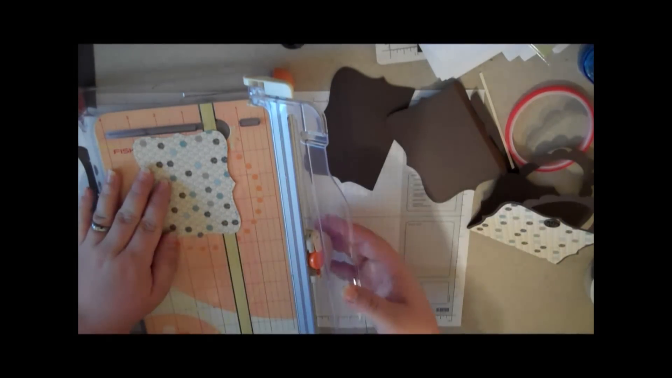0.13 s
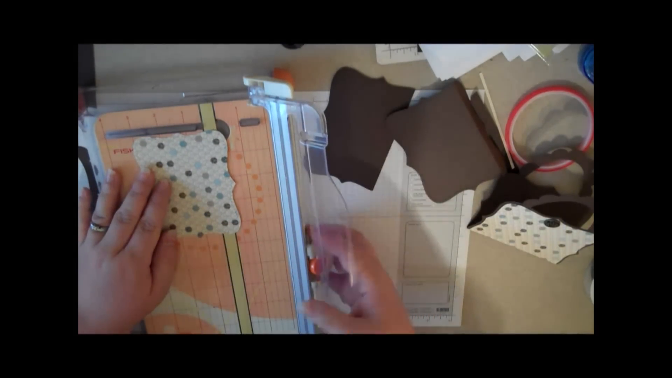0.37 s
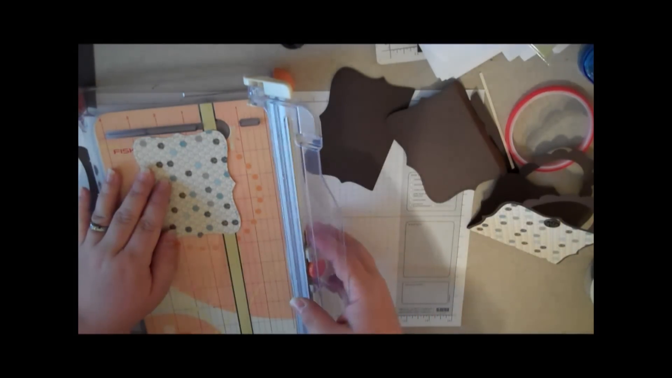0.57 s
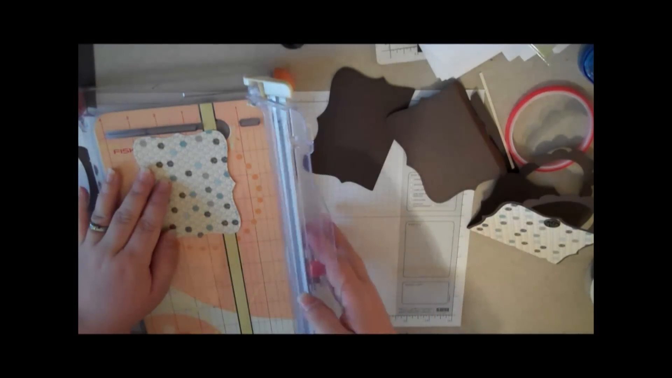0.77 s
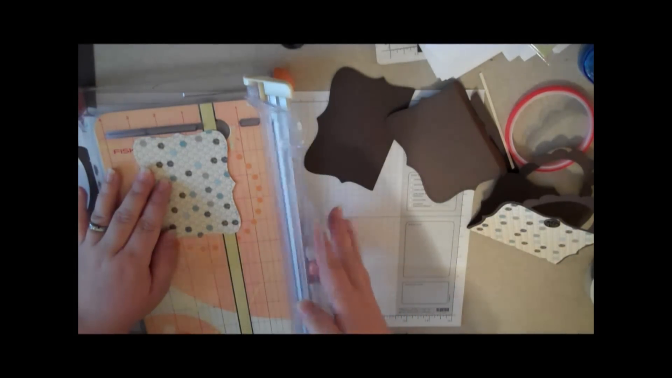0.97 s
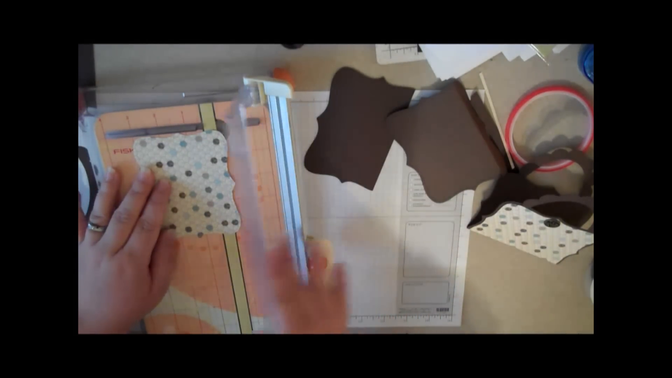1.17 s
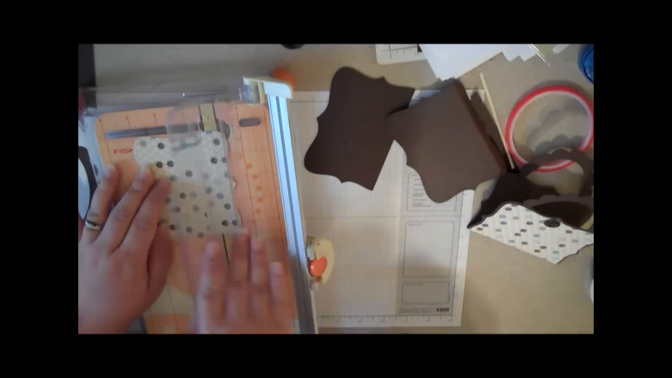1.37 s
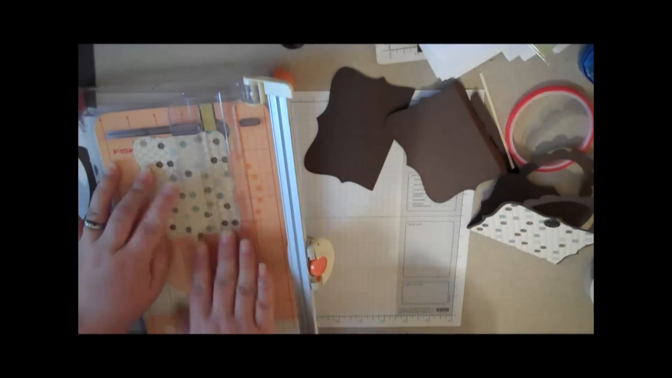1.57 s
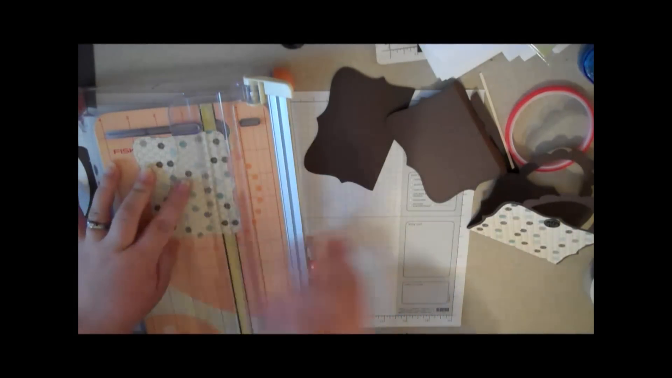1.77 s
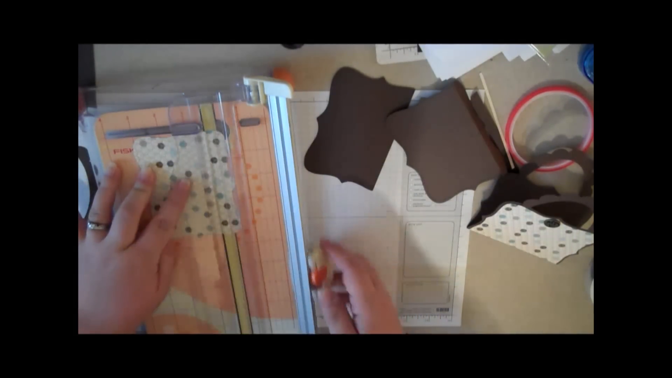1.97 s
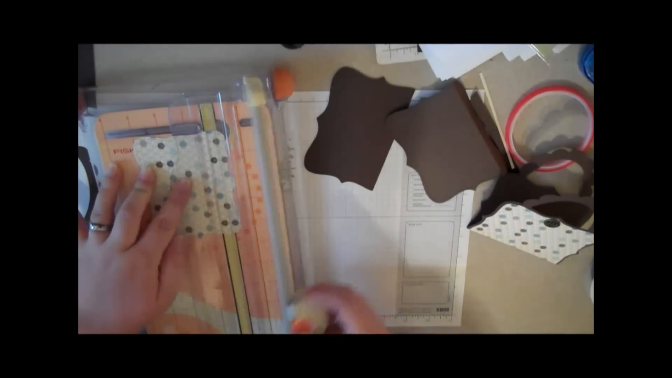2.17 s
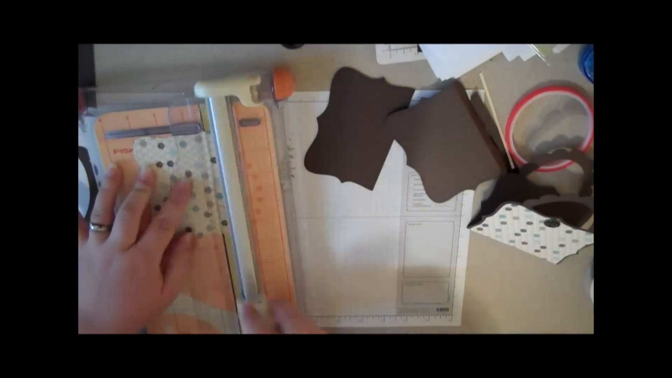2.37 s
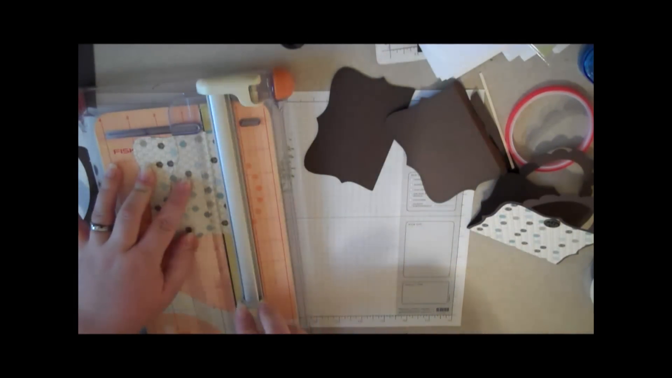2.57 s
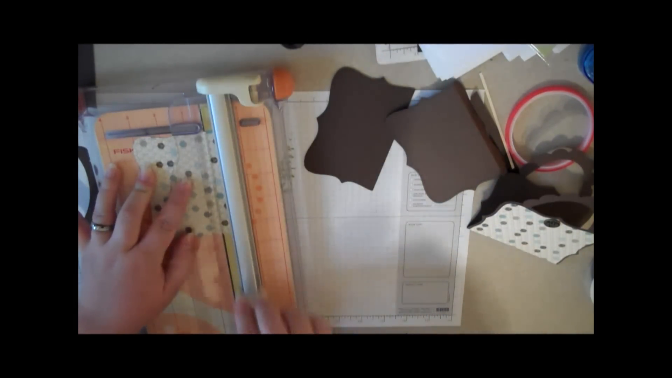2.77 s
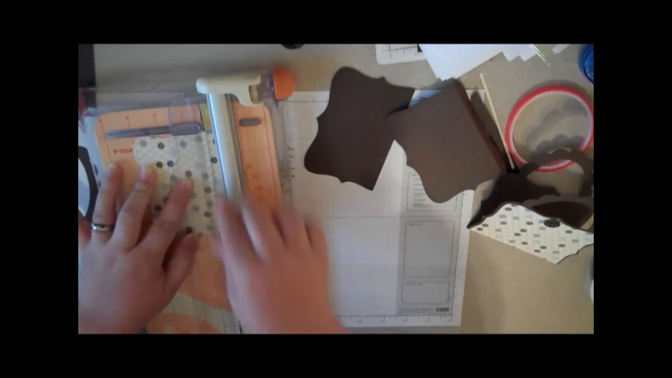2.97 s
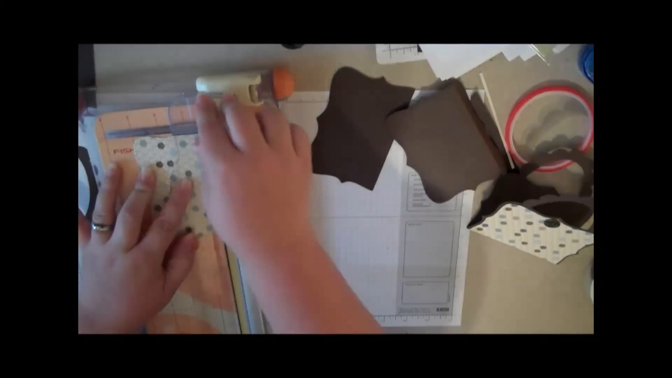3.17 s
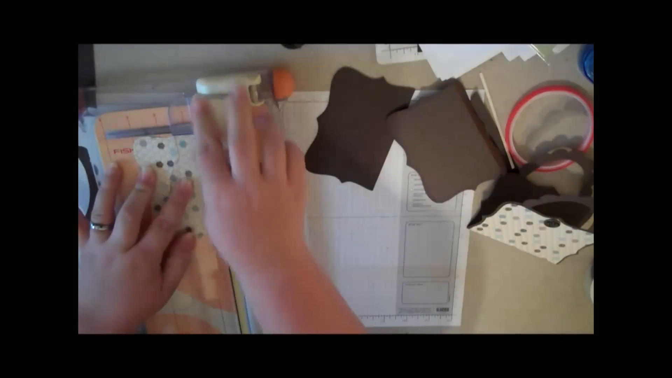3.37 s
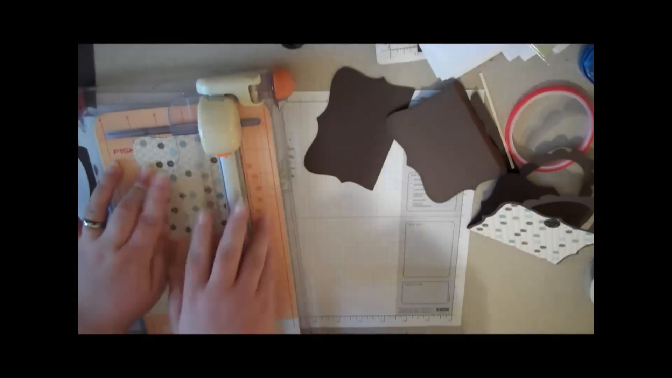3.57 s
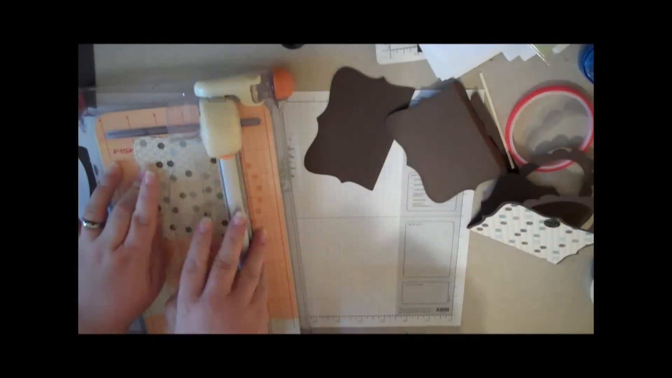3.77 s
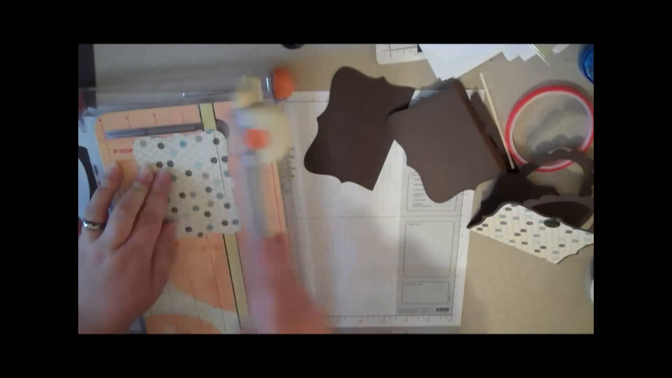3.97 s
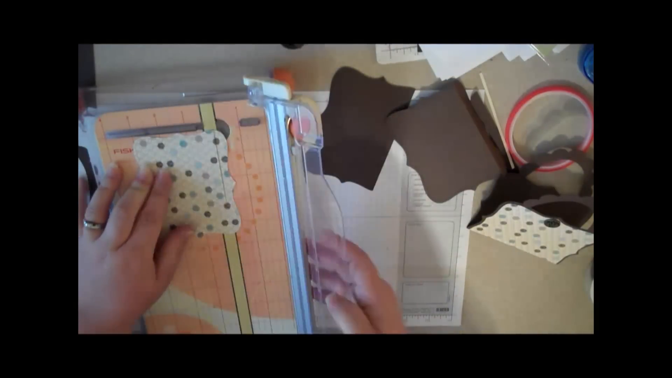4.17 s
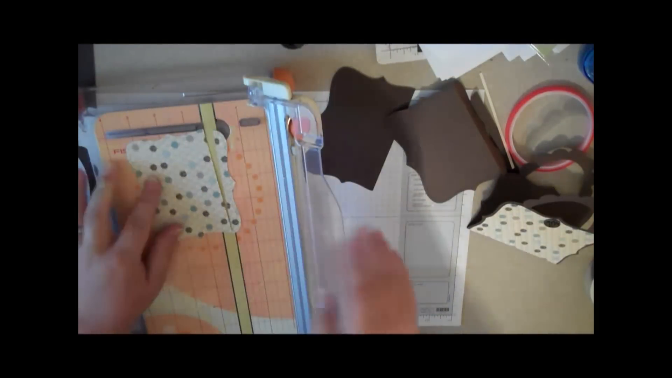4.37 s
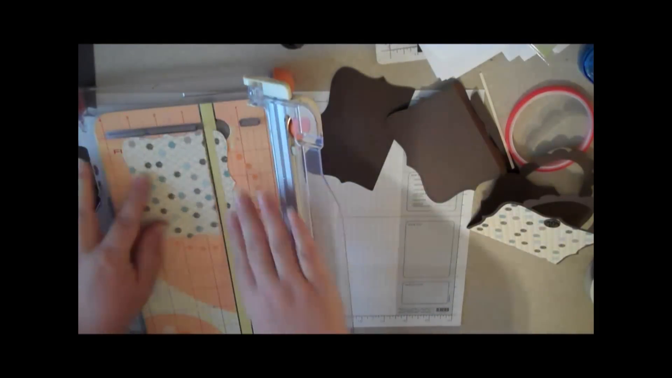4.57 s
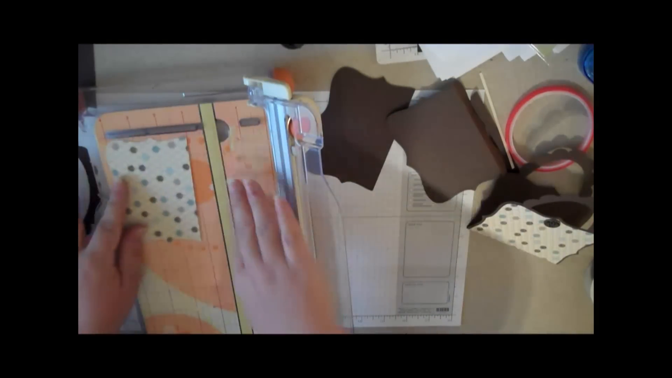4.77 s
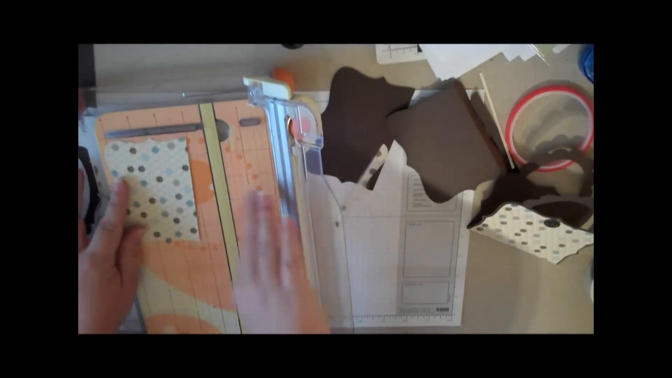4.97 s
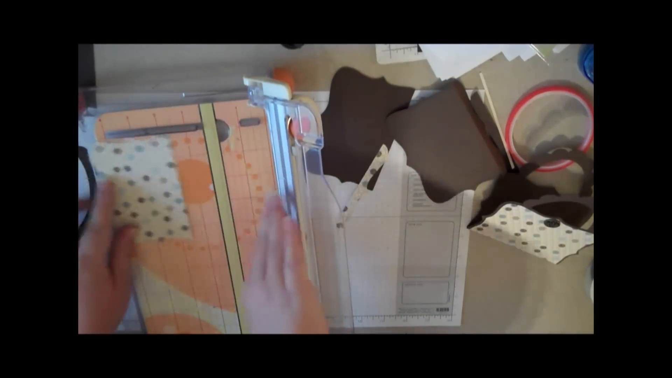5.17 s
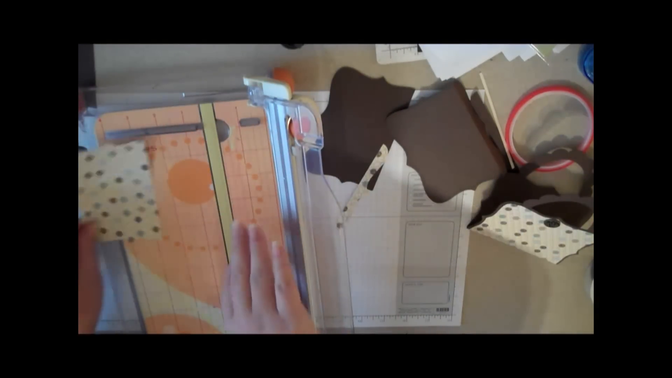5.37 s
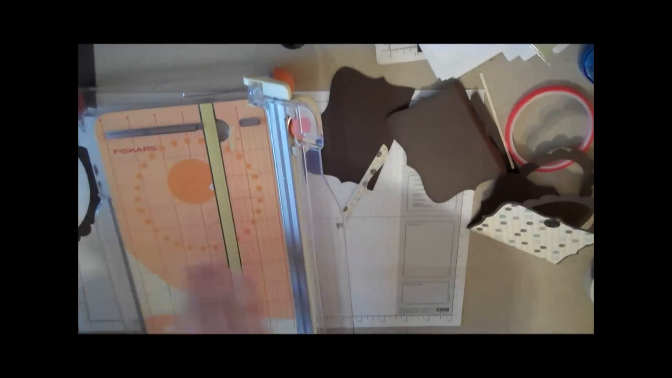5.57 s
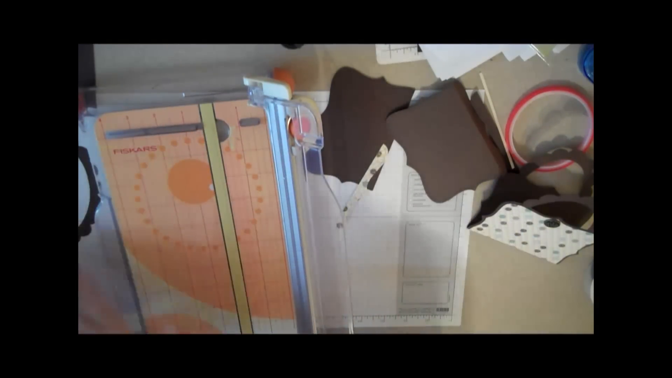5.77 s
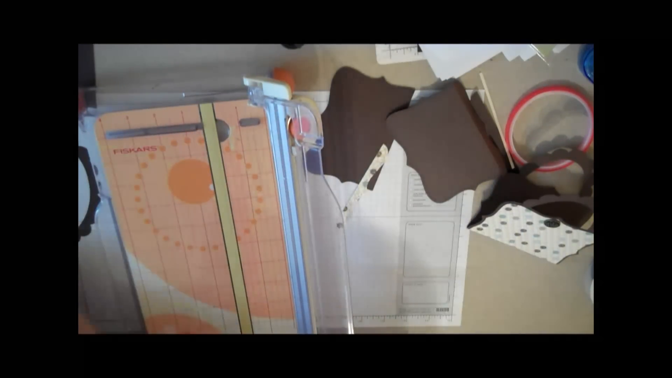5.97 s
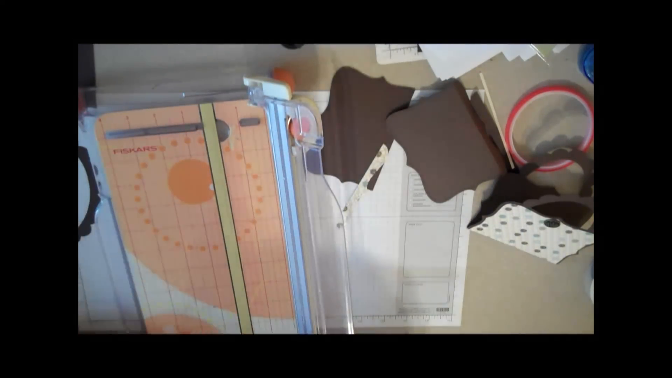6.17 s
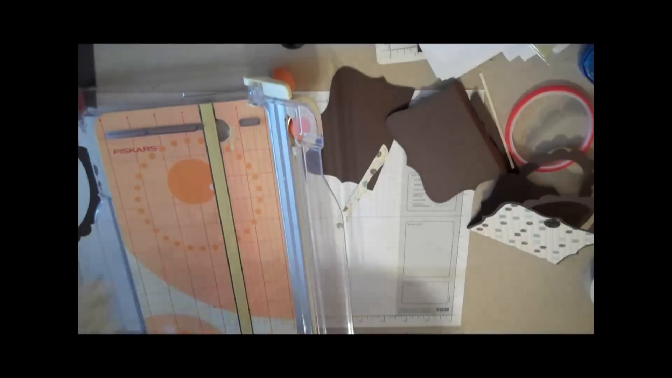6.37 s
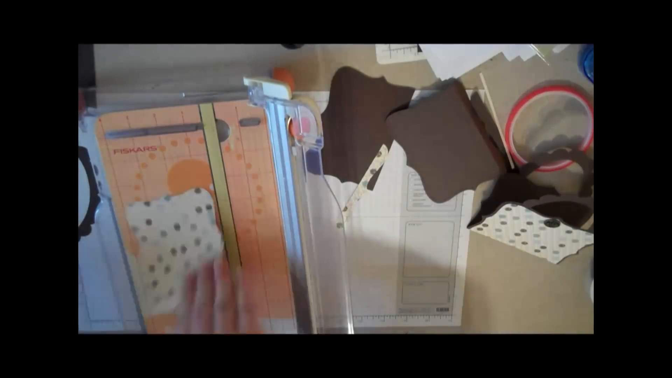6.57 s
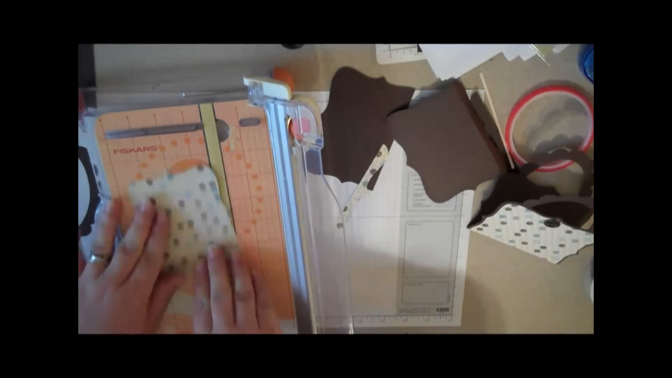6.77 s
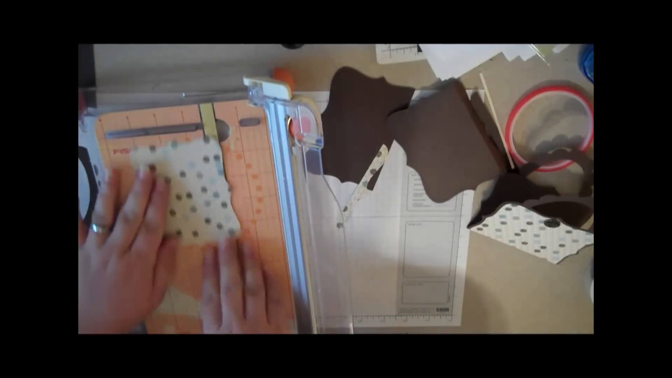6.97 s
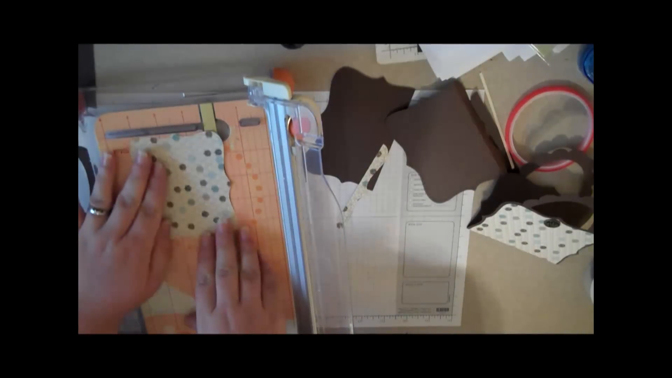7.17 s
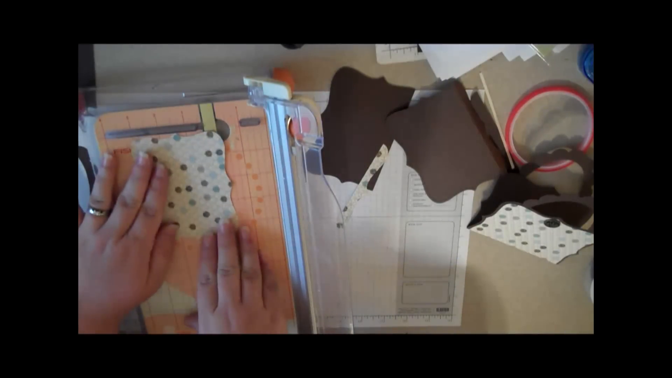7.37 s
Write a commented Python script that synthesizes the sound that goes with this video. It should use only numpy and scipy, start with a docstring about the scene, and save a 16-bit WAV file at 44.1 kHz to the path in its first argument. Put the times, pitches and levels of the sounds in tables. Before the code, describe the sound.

Indoors, close to the desk, a sliding paper trimmer is worked by hand. Quiet knocks lead to a bright hard snap, a double clack, and a swelling gritty rasp as the blade cuts card, ending in crisp stop clicks. A second strong snap opens the arm. Afterwards come small ticks, papery slides and a light flop as card is replaced, with tiny wavering chirps at left over faint hiss and hum.

```python
"""Soft knocks and a faint hiss on a rail open in a small humming room: a plastic paper trimmer on a desk, up close.
Its arm swings over and snaps home, the cutter rasps along the rail and hits its stops, and the arm swings back.
Then card slides off the board and is laid on again; thin high chirps come from the left.
Blows are noise bursts ringing plastic modes, slides are grainy filtered noise, chirps are wavering sines;
echoes, hollow desk rings, low shudders, hiss and hum surround them."""
import sys
import numpy as np
from scipy import signal
from scipy.fft import rfft, irfft, next_fast_len
from scipy.io import wavfile
from scipy.ndimage import uniform_filter1d

SR = 44100
rng = np.random.default_rng(int(sys.argv[2]) if len(sys.argv) > 2 else 0)


def int16_out(signal):
    """Quantize to a 16-bit WAV file."""
    q = np.round(np.clip(np.atleast_2d(signal).T, -1, 1) * 32767)
    wavfile.write(sys.argv[1], SR, q.astype(np.int16))


N = 327663
HISS_EDGE_HZ = 14300  # top of the slides, chirps, echoes and room hiss

# edges between the six registers of a blow: boom, thud, board, clack, snap, tick [Hz]
REGISTER_HZ = [230, 480, 1400, 4200, 9000]
# left-over-right balance of blows and slides, before panning: pitch_hz [Hz], balance_db [dB]
PORTS = [(100, 1), (2400, -.5), (4400, -2.5), (5800, -9.5), (7000, 8), (8100, 10.5), (14000, 8)]
# pushes of the cutter along its rail, levels before trims and sag:
# start_s, rise_s, hold_s, release_s [s], hiss_db, rasp_db [dB]
RAIL_STROKES = [(.24, 0.065, .025, 0.083, -50.5, -65), (.375, 0.02, 0.025, .02, -52.5, -69),
                (1.925, 0.076, 0.064, 0.15, -41, -54), (2.1, .035, .03, .14, -39, -56),
                (2.715, 0.098, 0.18, .03, -40, -47), (2.947, 0.02, 0.16, 0.055, -27.5, -39)]
# colour of the blade's rasp: pitch_hz [Hz], level_db [dB]
RAIL_RASP = [(40, -25.5), (150, -7), (230, -10.5), (330, -13), (550, -20.5), (750, -6.5), (1100, -12.5),
             (1500, -4), (2100, 1), (3800, 1.5), (5000, -4.5), (8000, -32)]
# likeness of left and right in diffuse sound: pitch_hz [Hz], likeness [0-1]
DIFFUSE = [(30, .55), (120, .85), (700, .84), (1400, .72), (3000, .45), (7000, .15), (12000, 0)]


def knocks(tone, size=8192):
    """All blows of arm, cutter and card on the trimmer; tone is how far its resonances stand out."""
    # blows: start_s [s], snap_db [dB], weight_db and clack_db [dB re snap], chatter_s [s],
    # note_hz [Hz] of the struck part, note_db [dB] before tone, pan_db [dB] (left positive, treble gets half)
    blow_rows = [(0.34, -62, -13, 3.5, .006, 730, 6, -12), (.448, -52, -24, -9, 0.0055, 6040, 14, -4),
                 (.803, -58, -18, 3.5, 0.0073, 1890, 26, 9), (.885, -54.5, -18, -5, 0.017, 940, 3, 0),
                 (.899, -43, -23.5, -4, .003, 2080, 21, 3), (0.95, -51, -24, -6, .004, 7760, 17, 21),
                 (1.508, -46.5, -11, 4, 0.0018, 1310, 7, -1), (1.532, -41.5, -21, -14, .0015, 7140, 4, 7),
                 (1.58, -30, -22, -10, 0.0077, 950, 4, -1), (1.5879, -11, -37, -12, .002, 5880, 13, 4),
                 (1.5905, -25, -21, 3, 0.0039, 2350, 14, 2), (1.602, -37, -12, 0, .003, 760, 6, 0),
                 (1.929, -47, -29.5, -7.5, 0.01, 850, 12, 2), (2.173, -46.5, -25.5, -4.5, 0.018, 760, 3, 7),
                 (2.22, -57, -4, 5.5, .012, 1620, 13, 4), (2.257, -59.5, -2, -2, .012, 750, -2, 1),
                 (2.446, -22, -32.5, -7, 0.00077, 3120, 2, 11.5),
                 (2.449, -20, -26, -3, 0.0031, 3200, 15, 5), (2.452, -22, -18.5, -13, 0.0028, 640, 12, 4),
                 (2.529, -37, -41, -27, 0.0027, 7200, 20, 2), (2.564, -47.5, -24, 3, 0.0045, 2220, 18, -3),
                 (2.622, -34.5, -30, -4.5, 0.0016, 4320, 12, -3),
                 (2.669, -40.5, -14.5, 2.5, .001, 810, -1, -2), (2.848, -44, -20, -5, .009, 5650, 4, -3),
                 (2.876, -35.5, -28, -17, 0.0052, 6100, 9, 0), (3.191, -21, -31, -9, 0.0024, 7100, 1, 2),
                 (3.321, -49.5, -8, 1, 0.0056, 720, 9, -4), (3.367, -59.5, -3, 0, .014, 643, 10, -2),
                 (3.393, -51.5, -15, 4, 0.0055, 1940, 8, 10), (3.411, -23, -31, -8.5, 0.016, 6100, 11, -5),
                 (3.418, -21, -37, -9.5, 0.0032, 5720, 8, -1), (3.424, -26, -25, -6, 0.0036, 5800, 10, 7),
                 (3.434, -37.5, -17, 5, 0.0038, 2170, 10, -6), (3.611, -38, -26, -10, 0.0021, 8100, 8, 13),
                 (3.642, -37.5, -17.5, -1, 0.0022, 840, 9, -6),
                 (3.892, -46, -20.5, -6.5, 0.0038, 7200, -1, -1),
                 (4.008, -47.5, -17, 0.5, 0.0053, 685, 0, 0), (4.047, -48.5, -11, 5.5, 0.0037, 830, 2, 3),
                 (4.084, -50.5, -16, -4, 0.0043, 830, 7, -5), (4.135, -10.5, -33, -16, .0018, 5850, 4, -4),
                 (4.1385, -18.5, -34, -9.5, 0.0016, 6030, 12, 2),
                 (4.158, -25, -40, -5.5, 0.0013, 5800, 16, 22), (4.16, -14, -43, -14, 0.0013, 5700, 3, 1.5),
                 (4.191, -39, -23, -0.5, 0.0054, 5720, 6, -2),
                 (4.575, -53, -3.5, -1, 0.016, 1890, 19, 19.5), (4.818, -40, -23, -7, 0.0015, 5980, 4, 12),
                 (4.825, -32, -21, -6, 0.014, 3270, 10, 11), (4.87, -43, -21, -5.5, 0.026, 2170, 4, 6),
                 (4.904, -27.5, -26.5, -7, 0.0026, 790, 12, 8), (4.951, -34, -27, -19, 0.015, 5770, 10, 5),
                 (4.991, -37.5, -30, -12, .014, 5720, 1, 8), (5.008, -29, -36, -7.5, 0.0034, 6400, -1, 3),
                 (5.125, -39, -14, 3, 0.0085, 3160, 16, 1), (5.158, -39.5, -17, -6, 0.0058, 770, 4, 8),
                 (5.175, -34.5, -30, -7, 0.0045, 6160, 11, 6), (5.275, -46, -25, 1.5, 0.0041, 6040, 2, 4),
                 (5.782, -47.5, -27, -12, 0.0056, 7600, 7, 10),
                 (5.964, -39, -28, -16, 0.0022, 7800, 20, 13), (6.204, -39, -33, -11, 0.0054, 6130, 14, -6),
                 (6.319, -35, -30, -7, 0.0057, 806, -2, 13), (6.594, -37, -38, -15, 0.0027, 6000, 2, 5),
                 (6.641, -38, -38, -14, .0056, 6300, 11, -1), (6.659, -46.5, -33, -1, 0.0037, 6240, 6, 3),
                 (6.681, -44.5, -26, -18, .002, 5900, 4, 6), (6.792, -41, -30, -23, 0.0037, 7500, 12, 17),
                 (7.38, -65.5, -18, 9.5, .012, 1770, 13, 10)]
    out = np.zeros((2, N))
    for row in blow_rows:
        start_s, blow = knock(row, rng.standard_normal((2, size)), tone)
        add(out, start_s, blow)
    return out


def knock(row, grit, tone, rattle_db=-9, rattle_s=0.019, bass_s=0.0095, bass_hz=450, touch=0.69, note_share=0.3):
    """One contact, a quick chatter and a short rattle of loose parts, all ringing the plastic."""
    # broad colour of a blow, before its registers are levelled: pitch_hz [Hz], level_db [dB]
    blow_colour = [(30, -22), (100, -23), (700, 2.5), (1500, 1.5), (2200, 4), (5000, 3.5), (7500, 3.5),
                   (9000, -5), (12000, -20.5), (14000, -22.5), (16000, -36)]
    start_s, snap_db, weight_db, clack_db, chatter_s, note_hz, note_db, pan_db = row
    size = grit.shape[1]
    t = np.arange(size) / SR
    hz = bins(t)
    chatter_s = max(chatter_s, 1e-4)
    chatter = unit(grit * np.exp(-t / chatter_s))
    rattle = unit(grit[:, ::-1] * np.exp(-t / rattle_s))  # the same noise read backwards
    force = chatter + amp(rattle_db) * rattle
    force[0, 0] += touch * np.sqrt(size) * np.exp(-chatter_s / 0.0096)  # the hard first touch of a brief blow
    thump = unit(grit * np.exp(-t / bass_s))  # the heavy board follows slowly
    heavy = 1 / (1 + (hz / bass_hz) ** 4)
    spectrum = rfft(pair(force)) * causal(1 - heavy + 0.015) + rfft(pair(thump)) * causal(heavy)
    spectrum = spectrum * sides(read(PORTS, hz) + .5 * pan_db * np.minimum(hz / 5000, 1))
    note_lift_db = tone * note_db * bump(hz, note_hz, note_share * note_hz + 60)
    colour = amp(read(blow_colour, hz) + note_lift_db) * plastic(hz) ** tone

    # where the blow lands sets how strongly each register answers
    register = np.searchsorted(REGISTER_HZ, hz)
    energy = np.bincount(register, np.mean(abs(spectrum * colour) ** 2, axis=0)) * 2 / size
    want_db = snap_db + registers(weight_db, clack_db, note_hz, pan_db)
    # blows harder than -41.5 dB are too brief to boom the desk fully; softer ones boom more
    want_db[0] -= 0.064 * (snap_db + 41.5)
    lift_db = (want_db - 10 * np.log10(energy / (.015 * SR)))[register]
    # blur the steps between registers, more widely in the treble
    narrow, medium, wide = (uniform_filter1d(lift_db, size=n) for n in (21, 121, 361))
    lift_db = np.select([hz < 900, hz < 2800], [narrow, medium], wide)
    fade = np.cos(np.pi / 2 * t / t[-1]) ** 2
    return start_s, irfft(spectrum * causal(colour * amp(lift_db))) * fade


def registers(weight_db, clack_db, note_hz, pan_db):
    """Target boom, thud, board, clack, snap and tick of a blow, in dB relative to its snap."""
    # the board's knock follows weight and clack, more so when the struck note is low
    board_db = 0.49 * weight_db + .5 * clack_db + 8 * (note_hz < REGISTER_HZ[2])
    tick_db = -21.5 + 0.74 * pan_db  # brighter for blows on the left
    return np.array([weight_db - 2.5, weight_db + 0.5, board_db, clack_db, 0, tick_db])


def plastic(hz):
    """Gain of the trimmer's resonances."""
    # what the plastic rings with: pitch_hz, width_hz [Hz], height_db [dB, callers scale it by an exponent]
    modes = [(151, 30, 8.5), (322, 58, 4.5), (440, 92, -2.5), (497, 29, 8.5), (614, 43, 5), (777, 170, 7.5),
             (988, 76, 5.5), (1286, 50, 3.5), (2050, 350, 2.5), (2460, 78, -0.5), (2730, 48, -6.5),
             (3160, 150, 0), (3860, 170, 2), (4380, 150, 2.5), (5510, 110, 4), (5850, 460, 7),
             (6100, 130, 0.5), (6800, 100, -3.5), (7080, 330, 4.5)]
    return amp(sum(db * bump(hz, f, width) for f, width, db in modes))


def cutter():
    """The carriage hisses and rumbles on the rail; the blade rasps and tears when it bites into card."""
    # colour of the carriage's hiss: pitch_hz [Hz], level_db [dB]
    rail_hiss = [(2500, -37), (4600, -9.5), (5700, 0.5), (6500, 0), (7400, 2), (8400, -5), (10000, -15),
                 (14000, -22.5)]
    # the blade tearing on through the card, level before trim and sag:
    # start_s, rise_s, hold_s, release_s [s], level_db [dB], first_hz, last_hz [Hz]
    blade_tears = [(3.03, 0.0556, .05, 0.0254, -38.5, 2655, 2920)]
    # the carriage rumbling as it nears the stop, level before sag:
    # start_s, rise_s, hold_s, release_s [s], level_db [dB], first_hz, last_hz [Hz]
    rumbles = [(2.85, .25, .1, .1, -57, 160, 230)]
    hiss = friction(RAIL_STROKES, 1, rail_hiss, (4500, 9000), grain_db=-0.5, grain_hz=250, ring=0.4, pan_db=3.0)
    rasp = friction(RAIL_STROKES, 2, RAIL_RASP, (1600, 4000), grain_db=-1.0, grain_hz=138, ring=0.49, pan_db=-1.0)
    tear = scrape(blade_tears, width_hz=760, grain_db=3.5)
    rumble = scrape(rumbles, width_hz=140, grain_db=2)
    return amp(-1.7) * hiss + amp(-2.5) * rasp + amp(-4.0) * tear + rumble


def fibres(per_s=110, spread_db=4, level_db=-4):
    """Single fibres of the card snap under the blade, in step with its rasp."""
    snaps = (rng.random(N) < per_s / SR) * amp(spread_db * np.minimum(rng.exponential(1, N), 3))
    hz = np.fft.rfftfreq(2048, 1 / SR)
    ring = irfft(causal(amp(read(RAIL_RASP, hz)) * plastic(hz)))
    return amp(level_db) * along(RAIL_STROKES, 2) * unit(signal.oaconvolve(snaps, ring)[:N])


def surge(depth_db=1.8, rate_hz=55):
    """The hand's push sticks and slips, so the whole stroke swells unevenly."""
    swell = unit(shape(rng.standard_normal(N), lambda hz: 1 / (1 + (hz / rate_hz) ** 4)))
    return amp(depth_db * swell)


def card():
    """Card and fingertips brush the board, hum as they drag and rasp at the card's edge."""
    # card and fingers sliding, levels before trims and sag:
    # start_s, rise_s, hold_s, release_s [s], hiss_db, rub_db [dB]
    card_strokes = [(.97, 0.22, 0.54, .03, -67, -68), (2.54, .03, .05, .03, -52, -50),
                    (3.92, .04, .05, .03, -62, -61.5), (4.095, 0.027, .004, .015, -61, -47),
                    (4.565, 0.013, 0.34, .03, -58.5, -53.5), (4.83, .02, .18, .04, -54, -53),
                    (5.13, .02, .06, .06, -54, -52), (5.29, 0.085, 0.011, .16, -51, -51),
                    (5.57, 0.019, 0.47, .04, -60, -60), (5.96, 0.071, 0.12, .15, -42, -53.5),
                    (6.19, 0.011, .13, 0.077, -44.5, -51), (6.4, 0.0084, 0.2, .03, -58, -62.5),
                    (6.612, 0.0093, .045, 0.11, -46, -53), (6.783, 0.008, 0.33, 0.18, -53, -58)]
    # colour of the card's hiss: pitch_hz [Hz], level_db [dB]
    card_hiss = [(2000, -27), (3200, -11), (4600, -7.5), (5900, 1), (7600, 1.5), (9000, -7.5),
                 (11000, -14.5), (14000, -18)]
    # colour of the lower rub: pitch_hz [Hz], level_db [dB]
    card_rub = [(50, -3.5), (120, -5), (220, -16), (350, -0.5), (900, -2), (1200, -1), (1550, 4.5),
                (1900, -0.5), (3200, 1), (6000, -18)]
    # a dragging fingertip's faint hum, level before trim and sag:
    # start_s, rise_s, hold_s, release_s [s], level_db [dB], first_hz, last_hz [Hz]
    finger_drags = [(4.6, .15, 0.076, 0.0257, -53.5, 1695, 1278),
                    (6.77, 0.043, 0.223, 0.158, -64, 1604, 1534)]
    # a card edge rasping as it is pulled away, level before trim and sag:
    # start_s, rise_s, hold_s, release_s [s], level_db [dB], first_hz, last_hz [Hz]
    edge_rasps = [(5.98, 0.0387, 0.0914, 0.049, -54, 3090, 3234), (6.19, .03, .04, .13, -42, 3500, 3300)]
    hiss = friction(card_strokes, 1, card_hiss, (4500, 7600), grain_db=1.0, grain_hz=150, ring=.15, pan_db=1.0)
    rub = friction(card_strokes, 2, card_rub, (1200, 3600), grain_db=1.5, grain_hz=119, ring=0.16, pan_db=4.5)
    drag = scrape(finger_drags, width_hz=150, grain_db=2.0) + scrape(edge_rasps, width_hz=2200, grain_db=1)
    return amp(3.0) * hiss + amp(-7.5) * rub + amp(-6.5) * drag


def flop(start_s=6.594, rise_s=.007, decay_s=0.0094, level_db=-27.5):
    """The card lands flat on the board and pushes the air out: a short, full puff."""
    # colour of the puff: pitch_hz [Hz], level_db [dB]
    puff_colour = [(200, -27), (450, -19), (700, -4.5), (1200, 1.5), (1550, -2), (2000, 3.5), (2600, -4.5),
                   (3200, -15.5), (6000, -13), (10000, -28)]
    t = np.arange(SR // 8) / SR
    swell = np.minimum(t / rise_s, 1) * np.exp(-np.maximum(t - rise_s, 0) / decay_s)
    puff = unit(shape(pair(rng.standard_normal((2, len(t)))), lambda hz: amp(read(puff_colour, hz))))
    out = np.zeros((2, N))
    add(out, start_s, amp(level_db) * swell * puff)
    return out


def friction(strokes, column, spectrum, band, grain_db, grain_hz, ring, pan_db):
    """Countless tiny slips, bunched into uneven grains, sound through the trimmer under each stroke."""
    bunches = unit(shape(rng.standard_normal(N), lambda hz: 1 / (1 + (hz / grain_hz) ** 2)))
    slips = wander(pair(rng.standard_normal((2, N))) * amp(grain_db * bunches), patchy_db=2.3)
    colour = lambda hz: amp(read(spectrum, hz)) * plastic(hz) ** ring * (hz < HISS_EDGE_HZ)
    panned = lambda hz: colour(hz) * sides(read(PORTS, hz) + pan_db * hz / (hz + 3000))
    sound = shape(unit(slips), panned)
    # divide by the colour's energy in the band that carries the sound
    hz = np.arange(SR / 2)
    in_band = np.sqrt(np.mean(colour(hz) ** 2 * (hz > band[0]) * (hz < band[1])))
    return along(strokes, column) * sound / in_band


def wander(x, patchy_db):
    """As the contact travels, different parts of the plastic answer: drifting patches of colour."""
    z = signal.stft(x, nperseg=512)[2]
    patches = uniform_filter1d(rng.standard_normal(z.shape[1:]), size=6, axis=0)  # blurred over pitch
    patches = unit(uniform_filter1d(patches, size=7, axis=1))  # and over time
    return signal.istft(z * amp(patchy_db * patches), nperseg=512)[1][:, :N]


def scrape(strokes, width_hz, grain_db):
    """Uneven slips ring one resonance that glides as the contact moves."""
    t, hz = np.arange(N) / SR, np.zeros(N)
    for start_s, rise_s, hold_s, release_s, _, first_hz, last_hz in strokes:
        end_s = start_s + rise_s + hold_s + release_s
        hz = np.where(t < start_s, hz, np.interp(t, [start_s, end_s], [first_hz, last_hz]))
    phase = 2 * np.pi * np.cumsum(hz) / SR
    bunches = unit(uniform_filter1d(rng.standard_normal(N), size=150))
    slips = rng.standard_normal((2, N)) * amp(grain_db * bunches)
    # slow noise on a cosine and a sine makes a noise band around the gliding pitch
    a, b = unit(shape(slips, lambda f: 1 / (1 + (2 * f / width_hz) ** 2)))
    return along(strokes, 1) * (a * np.cos(phase) + b * np.sin(phase))


def along(strokes, column):
    """Gain of pushes: each speeds up, holds with a slow drift and dies away by 20 dB per release time."""
    # while a push lasts the hand slows (first level sags) and bears down (second grows):
    # level column -> sag_db_per_s [dB/s]
    sag_db_per_s = {1: 8, 2: -1.5}
    power = np.zeros(N)
    for start_s, rise_s, hold_s, release_s, *levels_db in strokes:
        t = np.arange(int((rise_s + hold_s + 2 * release_s) * SR)) / SR
        held_s = np.clip(t - rise_s, 0, hold_s)
        released_s = np.maximum(t - rise_s - hold_s, 0)
        db = levels_db[column - 1] - sag_db_per_s[column] * held_s - 20 * released_s / release_s
        add(power, start_s, (np.minimum(t / rise_s, 1) * amp(db)) ** 2)
    return np.sqrt(power)


def chirps(peak_s=.007, upper_ratio=1.69, upper_db=-20, level_db=-1.5):
    """Brief, rough whistles near 8 kHz with a faint upper partial, on the left."""
    # thin chirps: start_s [s], level_db [dB, before trims and panning], pitch_hz [Hz, before waver]
    chirp_rows = [(0.4384, -40, 7950), (0.704, -38.5, 7930), (1.4336, -45, 8160), (4.3844, -36, 7780),
                  (5.7843, -36.5, 8040), (6.1135, -25.5, 7980), (6.4035, -24.5, 7860), (6.541, -37.5, 8020),
                  (6.7238, -26.5, 7800), (6.7744, -31, 8030), (7.001, -30, 7740), (7.1856, -39, 8020),
                  (7.312, -30.5, 7860)]
    out, t = np.zeros(N), np.arange(SR // 10) / SR
    swell = ((t / peak_s) * np.exp(1 - t / peak_s)) ** 3
    for start_s, db, hz in chirp_rows:
        waver_hz = 220 * unit(uniform_filter1d(rng.standard_normal(len(t)), size=16))
        phase = 2 * np.pi * np.cumsum(hz + waver_hz) / SR
        whistle = np.sin(phase) + amp(upper_db) * np.sin(upper_ratio * phase)
        add(out, start_s, amp(db + level_db) * swell * whistle)
    return shape(out, lambda hz: hz < HISS_EDGE_HZ) * sides(17.0)


def ports(x, share=.8):
    """Direct sound reaches left and right slightly out of step."""
    # phase by which left leads, before share: pitch_hz [Hz], lead_rad [radians]
    lead = [(0, 0), (2410, -0.23), (5080, -1.0), (5680, -0.7), (6030, 0.1), (6980, 0.2), (7670, -1.0),
            (8870, -1.6), (12700, -3.7), (14200, -0.5), (14600, -3.6), (15200, -2.1), (15600, -2.8)]
    opposite = np.array([[1], [-1]])
    return shape(x, lambda hz: np.exp(.5j * share * read(lead, hz) * opposite))


def hollow(x):
    """The desk's hollow rings on at a few pitches after each blow or slide."""
    # hollow rings: pitch_hz [Hz], level_db [dB, before scaling by length], t60_s [s]
    hollow_rings = [(356, -16.5, .38), (613, -20.5, .3), (756, -18.5, .42)]
    t = np.arange(SR // 2) / SR
    ring = sum(amp(db - 60 * t / t60_s) * np.sin(2 * np.pi * hz * t) for hz, db, t60_s in hollow_rings)
    return signal.fftconvolve(x.mean(0), ring / np.sqrt(len(t)))[:N]


def desk():
    """Low, loose modes of the desk top, rising in a few milliseconds and dying away."""
    # shudders under the heaviest blows: start_s [s], level_db [dB, before envelope], pitch_hz [Hz], decay_s [s]
    shudders = [(1.59, -37, 320, .03), (2.45, -40, 112, .03), (4.137, -44, 172, .03),
                (4.138, -56, 52, 0.082), (4.161, -46, 103, 0.033), (6.80, -62.5, 80.7, .05)]
    out, t = np.zeros(N), np.arange(SR // 2) / SR
    for start_s, db, hz, decay_s in shudders:
        wobble = unit(shape(rng.standard_normal(len(t)), lambda f: bump(f, hz, 0.36 * hz) ** 2))
        add(out, start_s, amp(db) * wobble * np.exp(-t / decay_s) * (1 - np.exp(-t / .004)))
    return out


def room(x, build_s=0.0027, early_db=4, early_s=0.014):
    """A small room: dense early echoes off the desk and walls, then a tail that dies band by band."""
    # ring of trimmer, desk and room: pitch_hz [Hz], t60_s [s]
    ring_times = [(60, 1), (150, 0.38), (400, 0.8), (800, 0.48), (1300, 0.51), (2800, 0.43), (6000, 0.53),
                  (9000, 0.39), (14000, 0.36)]
    hz, t, z = signal.stft(pair(rng.standard_normal((2, SR * 3 // 4)), DIFFUSE), SR, nperseg=256)
    tail = signal.istft(z * amp(-60 * t / read(ring_times, hz)[:, None]), SR, nperseg=256)[1]
    t = np.arange(tail.shape[1]) / SR
    tail *= (1 - np.exp(-(t / build_s) ** 2)) * (1 + amp(early_db) * np.exp(-t / early_s))
    # colour of the echoes: pitch_hz [Hz], level_db [dB]
    echo_db = [(100, 7), (350, 8.5), (800, 2.0), (2000, -0.5), (4000, -3.5), (5800, -5.5), (8000, -5.0),
               (14000, -3)]
    tail = shape(tail / np.linalg.norm(tail[0]), lambda hz: amp(read(echo_db, hz)) * (hz < HISS_EDGE_HZ))
    return signal.fftconvolve(x, tail, axes=1)[:, :N]


def background(air_db=-60.3, hum_hz=123, hum_db=-68.5, waver=0.35, waver_hz=6):
    """Steady hiss of room and microphone, and a wavering hum."""
    # colour of the hiss, before levelling: pitch_hz [Hz], level_db [dB]
    floor_colour = [(15, -39.5), (25, -10), (60, -17), (87, -31), (102, -6), (122, -12.5), (231, -21),
                    (539, -18), (684, -16.5), (1020, -19.5), (1730, -21), (1870, -21.5), (4990, -22.5),
                    (6330, -20), (14000, -30)]
    floor_gain = lambda hz: amp(read(floor_colour, hz)) * (hz < HISS_EDGE_HZ)
    air = shape(pair(rng.standard_normal((2, N)), DIFFUSE), floor_gain)
    air /= np.std(shape(air, lambda hz: hz > 200))  # levelled by what lies above the rumble
    drift = unit(shape(rng.standard_normal((2, N)), lambda hz: 1 / (1 + (hz / waver_hz) ** 4)))
    phase = 2 * np.pi * hum_hz * np.arange(N) / SR
    hum = unit((1 + waver * drift[0]) * np.sin(phase) + waver * drift[1] * np.cos(phase))
    return amp(air_db) * air * sides(1.0) + amp(hum_db) * hum


def pair(x, likeness=None):
    """Two unrelated noises become left and right: more alike in the bass than in the treble."""
    # likeness of left and right in direct sound: pitch_hz [Hz], likeness [0-1]
    direct_likeness = [(30, .8), (120, .97), (1400, .96), (3000, .9), (5000, .75), (7000, .55), (10000, .2)]
    points = direct_likeness if likeness is None else likeness
    same = lambda hz: np.clip(read(points, hz), -1, 1)
    mid = shape(x[0], lambda hz: np.sqrt((1 + same(hz)) / 2))
    side = shape(x[1], lambda hz: np.sqrt((1 - same(hz)) / 2))
    return np.array([mid + side, mid - side])


def sides(db):
    """Left and right gains of constant power for a level difference (left positive)."""
    gains = amp(np.array([db, -db]).reshape(2, -1) / 2)
    return gains / np.sqrt(np.mean(gains ** 2, axis=0))


def bump(hz, centre_hz, width_hz):
    """A resonance curve of height 1."""
    return 1 / (1 + (2 * (hz - centre_hz) / width_hz) ** 2)


def causal(gain):
    """The quickest causal filter that has this gain (minimum phase)."""
    cepstrum = irfft(np.log(np.maximum(gain, 1e-5)))
    half = cepstrum.shape[-1] // 2
    # fold the cepstrum onto positive time
    cepstrum[..., 1:half] *= 2
    cepstrum[..., half + 1:] = 0
    return np.exp(rfft(cepstrum))


def shape(x, gain):
    """Filters x by a function of frequency."""
    size = next_fast_len(x.shape[-1], True)
    return irfft(rfft(x, size) * gain(np.fft.rfftfreq(size, 1 / SR)), size)[..., :x.shape[-1]]


def bins(x):
    """Frequencies of the spectrum of x."""
    return np.fft.rfftfreq(x.shape[-1], 1 / SR)


def read(points, hz):
    """Reads a (Hz, value) table on a log-frequency axis."""
    f, value = np.transpose(points)
    return np.interp(np.log(hz + 1), np.log(f + 1), value)


def amp(db):
    """Decibels to gain."""
    return 10 ** (np.asarray(db) / 20)


def unit(x):
    """Scales to rms 1."""
    return x / np.sqrt(np.mean(x ** 2) + 1e-20)


def add(mix, start_s, sound):
    """Mixes a sound in at its start time."""
    part = mix[..., round(start_s * SR):][..., :sound.shape[-1]]
    part += sound[..., :part.shape[-1]]


def scene():
    """Trimmer and card up close, with the chirps, all in the room."""
    slides = surge() * (cutter() + fibres()) + card()
    whistles = amp(-1.5) * chirps()
    blows = knocks(tone=1.0)
    puff = flop()
    direct = ports(blows + slides + puff) + whistles
    # the room gathers sound from all faces of the trimmer, so its resonances even out there
    radiated = amp(-10.5) * knocks(tone=0.35) + amp(-7.0) * slides + amp(-11) * puff + whistles
    return direct + room(radiated) + hollow(blows + slides) + desk() + background()


def record(dry, edge_hz=15700):
    """Peaks beyond full scale are clipped; a steep low-pass then limits the band."""
    clipped = np.clip(dry, -1, 1)
    low_pass = signal.firwin(255, edge_hz, window=("kaiser", 8), fs=SR)
    return signal.oaconvolve(clipped, low_pass[None], "same")


dry = scene()
out = record(dry)
int16_out(out)
```